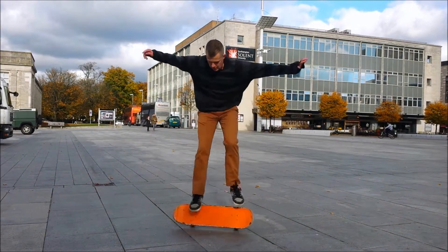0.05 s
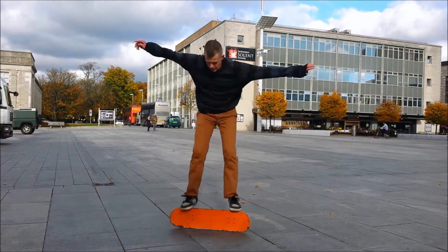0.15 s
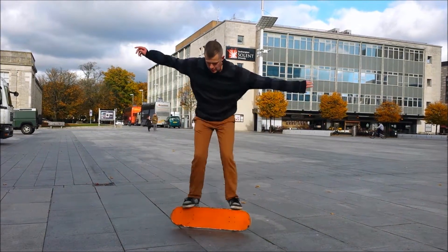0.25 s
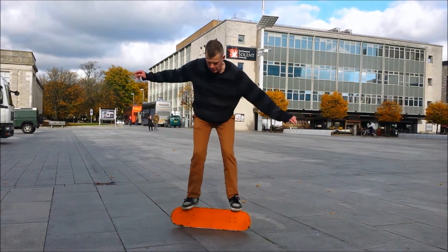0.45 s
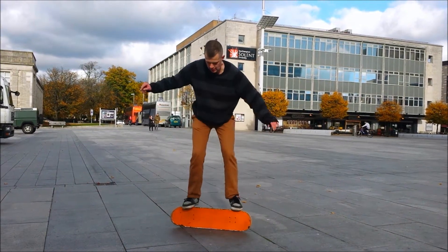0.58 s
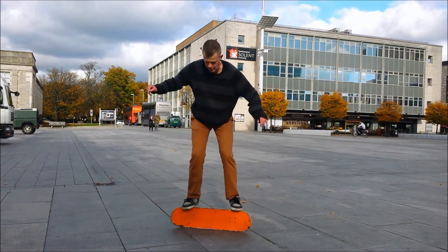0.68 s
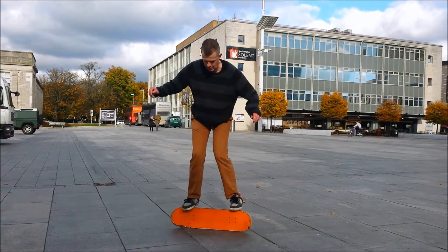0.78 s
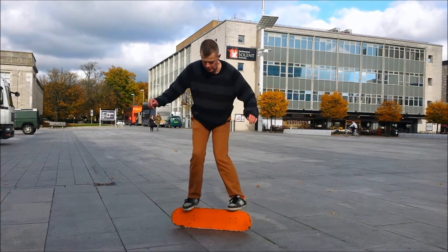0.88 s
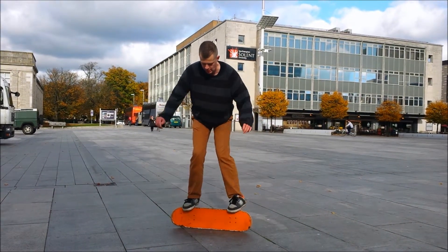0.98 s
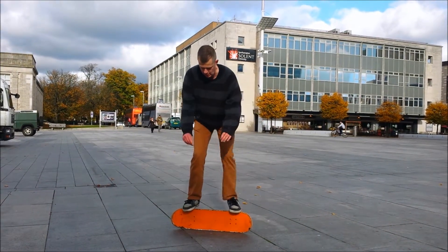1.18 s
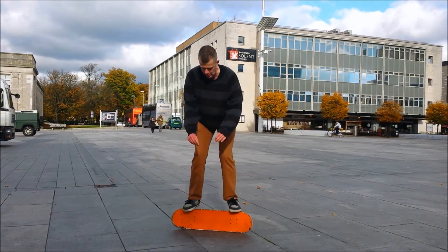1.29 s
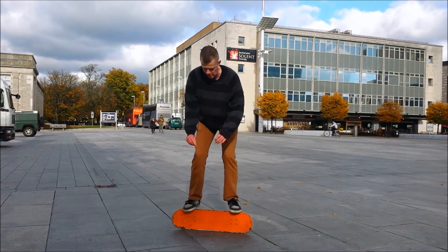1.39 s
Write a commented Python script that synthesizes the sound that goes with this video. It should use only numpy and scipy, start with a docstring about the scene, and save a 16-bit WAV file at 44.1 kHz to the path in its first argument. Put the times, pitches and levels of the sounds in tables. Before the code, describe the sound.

A skateboard drops onto paving in an open city square, heard close in stereo. A dull thump at 0.13 s, gritty shoe scuffing around 0.22 s, then deck, wheels and trucks clatter in rapid bright clacks from 0.3 to 0.41 s. Light scuffs lead to a double woody knock at 0.52 s. Softer knocks follow near 1.06 and 1.34 s over faint rumbling, hissing traffic.

```python
"""A skateboard balanced on its edge drops onto paving stones in an open city square.
Traffic, made of coloured noise, rumbles far off throughout. First comes a dull blow and a shoe scuffs the deck,
as swells of random grit clicks. Deck and wheels then clatter down in a quick run of clacks, made of ringing
modes with bright noise cracks, and grit snaps. Last, the board knocks as the rider rocks on it."""
import sys
import numpy as np
from scipy import signal
from scipy.fft import rfft, irfft
from scipy.io import wavfile

SR = 44100
rng = np.random.default_rng(int(sys.argv[2]) if len(sys.argv) > 2 else 0)


def pcm_store(signal):
    """Save signal as 16-bit PCM."""
    levels = np.round(np.clip(np.atleast_2d(signal), -1, 1) * 32767)
    wavfile.write(sys.argv[1], SR, levels.astype(np.int16).T)


N = 63945  # length of the scene in samples
T = np.arange(N) / SR  # time of each sample, s
BIN_HZ = np.arange(N + 1) * SR / (2 * N)  # frequency of each spectrum bin


def from_db(db):
    """Turn decibels into a gain."""
    return 10 ** (np.asarray(db) / 20)


def rms_one(x):
    """Scale a sound to an rms of 1."""
    return x / np.sqrt(np.mean(x ** 2))


def at_hz(points):
    """Read a frequency table at every spectrum bin, in straight lines over log frequency."""
    hz, value = np.transpose(points)
    return np.interp(np.log(BIN_HZ + 1), np.log(hz), value)


def shape(x, gain):
    """Multiply each frequency of a sound by its own gain."""
    return irfft(rfft(x, 2 * N) * gain)[..., :N]


def lowpass(x, hz):
    """Dull a sound above a given frequency."""
    return signal.sosfilt(signal.butter(2, hz, fs=SR, output="sos"), x)


def bandpass(x, band_hz):
    """Keep one band of a sound, with steep edges."""
    return signal.sosfilt(signal.butter(4, band_hz, "band", fs=SR, output="sos"), x)


def add(track, s, sound):
    """Mix a sound into a track at a time in seconds."""
    start = int(s * SR)
    track[start:start + len(sound)] += sound[:N - start]


# How alike left and right are in spread-out sound: (frequency [Hz], likeness [0 to 1])
LEFT_RIGHT_LIKENESS = [(100, .99), (300, .97), (640, 0.76), (1400, 0), (3000, 0.12), (15000, 0)]


def diffuse(pair, spectrum):
    """Colour two unrelated signals and blend them into stereo, most alike in the bass; rms 1."""
    alike = at_hz(LEFT_RIGHT_LIKENESS)
    gain = from_db(at_hz(spectrum))
    mid = shape(pair[0], gain * np.sqrt(1 + alike))
    side = shape(pair[1], gain * np.sqrt(1 - alike))
    return rms_one(np.array([mid + side, mid - side]))


def noise(spectrum):
    """Make coloured stereo noise; rms 1."""
    return diffuse(rng.standard_normal((2, N)), spectrum)


def level_curve(points):
    """Turn a level table into a gain that moves in straight lines of decibels."""
    return from_db(np.interp(T, *np.transpose(points)))


def swells(rows):
    """Rise and fall smoothly around the middle time of each row."""
    return sum(from_db(db) * np.exp(-(2 * (T - s) / length) ** 2) for s, length, db in rows)


def dying(s, decay_s):
    """Rise quickly at a time, then die away exponentially."""
    rise_s = 0.00052  # time constant
    age = np.maximum(T - s, 0)
    return (1 - np.exp(-age / rise_s)) * np.exp(-age / decay_s)


# Colour of the low traffic rumble: (frequency [Hz], relative level per Hz [dB])
RUMBLE_COLOUR = [(22, -24), (40, -29), (62, -7.5), (85, -1.5), (115, 0.5), (160, -3.5), (270, -2),
                 (400, -10), (550, -19.5), (900, -37), (2000, -61), (6000, -80)]
# Loudness of the rumble: (time [s], level [dB])
RUMBLE_LOUDNESS = [(0, -34.5), (.17, -32.5), (.3, -39), (.45, -41), (.7, -41.5), (1.0, -41), (1.28, -42.5),
                   (1.38, -38.5), (1.45, -39)]


def traffic_rumble():
    """Distant traffic reaches us as noise, strongest in the bass."""
    return level_curve(RUMBLE_LOUDNESS) * noise(RUMBLE_COLOUR)


# Colour of the deep engine drone: (frequency [Hz], relative level per Hz [dB])
DRONE_COLOUR = [(20, -43), (50, -12), (62, 0), (74, -9), (110, -31), (500, -88)]
# Loudness of the drone: (time [s], level [dB])
DRONE_LOUDNESS = [(0, -38.5), (.1, -38), (.2, -59), (.27, -45), (.45, -48.5), (1.35, -53), (1.45, -39)]


def engine_drone():
    """An engine hums as a narrow band of noise near 62 Hz."""
    return level_curve(DRONE_LOUDNESS) * noise(DRONE_COLOUR)


# Colour of the wide traffic hiss: (frequency [Hz], relative level per Hz [dB])
HISS_COLOUR = [(200, -6), (600, 2), (1150, 2), (1400, -4.5), (1750, 0.5), (2300, -4.5), (3200, -4.5),
               (4200, -13.5), (5500, -9), (7000, -17.5), (9000, -27), (11000, -40.5), (14500, -38)]
# Loudness of the hiss: (time [s], level [dB])
HISS_LOUDNESS = [(0, -36.5), (.15, -35.5), (.3, -36.5), (.45, -41), (.7, -43.5), (1.0, -45.5), (1.2, -45),
                 (1.33, -43), (1.45, -41.5)]


def traffic_hiss():
    """Distant traffic also hisses, as noise spread wide between left and right."""
    return level_curve(HISS_LOUDNESS) * noise(HISS_COLOUR)


def high_hiss():
    """A thin, steady band of very high noise is heard on the right only."""
    center_hz, width_hz, level_db = 12500, 280, -75.5
    band = np.exp(-((BIN_HZ - center_hz) / width_hz) ** 2)
    hiss = from_db(level_db) * rms_one(shape(rng.standard_normal(N), band))
    return hiss * np.array([[0], [1]])


def city():
    """Add up the background of the city."""
    return traffic_rumble() + engine_drone() + traffic_hiss() + high_hiss()


def square(near):
    """Paving and facades scatter sound back faintly: a dull noise tail that dies away."""
    level_db, t60_s, dull_hz = -27, 1, 4000  # t60: time to fall by 60 dB
    tail = lowpass(rng.standard_normal((2, N)), dull_hz) * from_db(-60 * T / t60_s)
    tail = diffuse(tail, [(100, 0), (10000, 0)])  # flat colour, only widened
    return from_db(level_db) * signal.fftconvolve(near, tail / np.sqrt(N), axes=1)[:, :N]


# Moments when clothing rustles: (middle time [s], length [s], level [dB])
RUSTLE_TIMES = [(.255, 0.11, -59), (1.26, 0.074, -60.5)]
# Colour of the rustle: (frequency [Hz], relative level per Hz [dB])
RUSTLE_COLOUR = [(3000, -12), (6000, 2), (9000, -2), (11000, -2), (14500, -2)]


def clothing():
    """Clothing rustles: faint swells of high noise."""
    return swells(RUSTLE_TIMES) * noise(RUSTLE_COLOUR)


# Moments when the shoe rubs the board: (middle time [s], length [s], level [dB])
SCUFF_TIMES = [(0.145, 0.0062, -30.5), (0.224, 0.024, -25.5), (0.24, 0.0081, -24.5), (0.248, 0.0097, -25),
               (0.262, 0.018, -34), (0.424, 0.042, -35.5), (0.477, 0.037, -33.5), (.505, 0.035, -36),
               (0.539, .025, -31.5), (0.573, .03, -43)]
# Colour of the scuff: (frequency [Hz], relative level per Hz [dB])
SCUFF_COLOUR = [(200, 4.5), (700, 0), (1150, 2.5), (1400, -9), (1700, 9.5), (2100, 1), (2500, 0),
                (3200, -13), (4200, -22), (7000, -21.5), (10000, -50), (14000, -40)]


def shoe():
    """Grit catches under the sole: random clicks of uneven strength, in short swells."""
    clicks_per_s, spread_db = 3000, 4.5
    caught = rng.random((2, N)) < clicks_per_s / SR
    direction = rng.choice([-1, 1], (2, N))
    strength = from_db(spread_db * rng.standard_normal((2, N)))
    return swells(SCUFF_TIMES) * diffuse(caught * direction * strength, SCUFF_COLOUR)


# Grit snapping under the wheels: (time [s], level [dB])
TICK_TIMES = [(.2975, -33), (0.4066, -39.5), (0.521, -46), (.5265, -46.5), (.6240, -46.5)]
# Colour of the snaps: (frequency [Hz], relative level per Hz [dB])
TICK_COLOUR = [(3000, -11), (6000, -1), (9000, 1.5), (15000, -1)]


def grit_ticks():
    """Small stones snap: very short bursts of bright noise."""
    decay_s = 0.0019  # time constant
    return sum(from_db(db) * dying(s, decay_s) for s, db in TICK_TIMES) * noise(TICK_COLOUR)


def contact(chatter_db, chatter_s):
    """One push, with a brief chatter of tiny contacts on rough stone."""
    t = np.arange(SR // 5) / SR  # room for the ring to die away
    chatter = rng.standard_normal(len(t)) * np.exp(-(t / chatter_s) ** 2)
    push = t == 0
    return push + from_db(chatter_db) * chatter / np.linalg.norm(chatter)


def ring(push, hz, t60):
    """One mode rings like a bell; a unit click starts it at height 1."""
    r = from_db(-60 / (t60 * SR))  # shrink per sample
    w = 2 * np.pi * hz / SR
    return signal.lfilter([1, 0, -1], [2, -4 * r * np.cos(w), 2 * r * r], push)


def body(push, modes, freedom):
    """A push rings all modes with random strengths; freedom scales both ring time and height."""
    spread_db = 2.94
    sound = 0
    for hz, db, t60 in modes:
        strength = from_db(db + spread_db * rng.standard_normal())
        sound = sound + strength * ring(push, hz, t60 * freedom)
    return freedom * sound


# Ringing modes of the wooden deck:
# (frequency [Hz], relative level [dB], time to fall 60 dB, before freedom scales it [s])
DECK_MODES = [(160, -22, 0.045), (223, -15.5, 0.037), (286, -15, 0.054), (344.5, -12, 0.06),
              (389, -15.5, 0.037), (440, -20.5, 0.027), (540, -15, 0.034), (644, -13.5, .036),
              (766, -14, .04), (820, -12, 0.052), (910, -23, 0.02), (1014, -15, .036), (1157, -25, 0.031)]


def struck_at(spot_hz):
    """The spot that is struck favours the deck modes near one pitch."""
    boost_db, width_octaves = 6, 0.25
    modes = []
    for hz, db, t60 in DECK_MODES:
        octaves_away = np.log2(hz / spot_hz)
        modes.append((hz, db + boost_db * np.exp(-(octaves_away / width_octaves) ** 2), t60))
    return modes


# Blows on the board: (time [s], relative deck level [dB], relative wheel and truck level [dB],
# crack level [dB], low-pass of the deck contact, lower is softer [Hz],
# freedom to ring under the feet [factor], deck pitch favoured by the spot struck [Hz])
BOARD_BLOWS = [(0.128, -7, -42, -33, 280, 0.57, 280), (0.2967, -17.5, -3, -20, 3500, 0.83, 810),
               (.3025, -20.5, -19, -33, 3000, 1.3, 540), (0.3139, -8, -7, -10, 4000, 0.96, 1010),
               (0.3178, -8.5, -3.5, -27.5, 3000, 1, 554), (0.3223, -10, -12.5, -35, 2000, 1.22, 820),
               (.3288, -15, -17, -25.5, 1870, 1.03, 820), (0.3384, -10, -11, -8, 4000, 0.81, 540),
               (0.3421, -13.5, -12, -27, 3000, 0.94, 820), (0.3492, -12, -25, -42, 1380, 0.72, 404),
               (0.354, -12, -15, -25, 3000, 0.63, 400), (0.3791, -7, -1, -21.5, 990, 0.84, 344),
               (.3820, -9.5, -5, -27.5, 890, 0.66, 330), (.4065, -38, -38, -27.5, 4000, 0.28, 820),
               (.4660, -31, -25, -39, 2500, 0.89, 340), (.5212, -5, -32, -25.5, 430, 0.68, 222),
               (.5260, -4, -22, -34, 695, 0.76, 470), (0.5433, -21, -31, -47, 1987, 0.59, 540),
               (0.5642, -26, -44, -45, 1200, 0.53, 540), (.6136, -21.5, -46, -48, 890, 0.68, 220),
               (0.6234, -18, -23, -47, 885, 0.67, 820), (.8925, -57, -67, -40, 4000, .5, 820),
               (1.0644, -13, -19, -37, 730, 0.76, 233), (1.2930, -24.5, -41, -43, 1530, 0.48, 1000),
               (1.3421, -11, -23, -28.5, 855, 0.61, 227)]
# Ringing modes of wheels and trucks (the axle mounts):
# (frequency [Hz], relative level [dB], time to fall 60 dB, before freedom scales it [s])
TRUCK_MODES = [(1685, -20.5, 0.034), (1737, -21, 0.039), (1870, -14, 0.015), (2116, -14.5, 0.02),
               (2253, -15, 0.021), (2500, -21.5, 0.027), (2700, -18.5, 0.021), (3000, -41, 0.0085)]
# Colour of the crack off the stone: (frequency [Hz], relative level per Hz [dB])
CRACK_COLOUR = [(1000, 6.5), (2800, 10.5), (3500, -5.5), (4150, 2.5), (5000, -7.5), (6000, -5),
                (7000, -1.5), (8500, -23), (11000, -24.5), (14500, -30)]


def board():
    """Each blow rings the wooden deck and the trucks, with a bright noise crack off the stone."""
    deck_chatter_db, deck_chatter_s = -6, 0.0045
    truck_chatter_db, truck_chatter_s = 0.5, 0.0025
    deck_band_hz, truck_band_hz = (91, 1206), (1420, 2950)
    crack_decay_s = 0.0042  # time constant
    left_lead_s = 0.00007  # the ringing reaches the left first
    wood, metal, crack = np.zeros(N), np.zeros(N), np.zeros(N)
    for s, deck_db, truck_db, crack_db, soft_hz, freedom, spot_hz in BOARD_BLOWS:
        deck_push = lowpass(contact(deck_chatter_db, deck_chatter_s), soft_hz)
        add(wood, s, from_db(deck_db) * body(deck_push, struck_at(spot_hz), freedom))
        truck_push = contact(truck_chatter_db, truck_chatter_s)
        add(metal, s, from_db(truck_db) * body(truck_push, TRUCK_MODES, freedom))
        crack += from_db(crack_db) * dying(s, crack_decay_s)
    left = bandpass(wood, deck_band_hz) + bandpass(metal, truck_band_hz)
    right = np.interp(T - left_lead_s, T, left)
    return np.array([left, right]) + crack * noise(CRACK_COLOUR)


def scene():
    """Board, grit, shoe and clothing sound in the square, over the city."""
    near = board() + grit_ticks() + shoe() + clothing()
    return near + square(near) + city()


# Colour difference of the two microphone ports: (frequency [Hz], left minus right [dB])
PORT_DIFFERENCE = [(100, -.5), (700, -1), (1300, 1), (2300, 8.5), (3200, 6.5), (4400, 3), (5600, 2.5),
                   (7000, -7), (9000, -14), (14000, -16.5)]


def record(dry):
    """Each microphone port has its own colour; peaks are rounded and the top is cut."""
    cutoff_hz = 15600
    half_each = np.array([[0.5], [-0.5]])  # left gets half the difference, right the opposite
    coloured = shape(dry, from_db(at_hz(PORT_DIFFERENCE) * half_each))
    rounded = coloured / (1 + coloured ** 4) ** (1 / 4)
    return signal.sosfilt(signal.cheby2(12, 60, cutoff_hz, fs=SR, output="sos"), rounded)


dry = scene()
out = record(dry)
pcm_store(out)
```